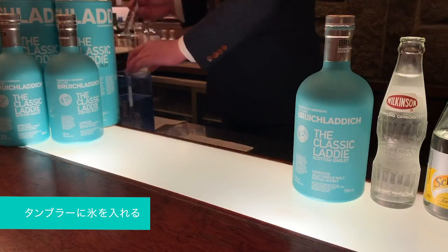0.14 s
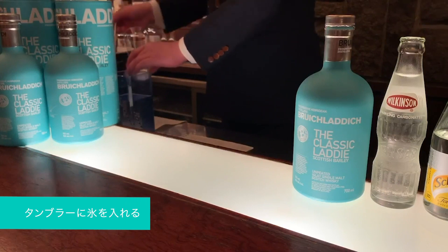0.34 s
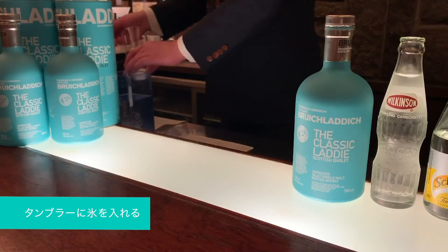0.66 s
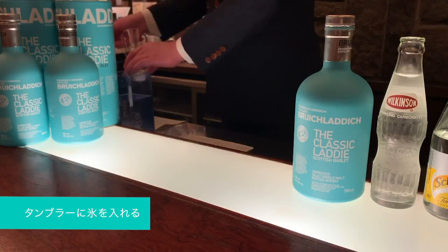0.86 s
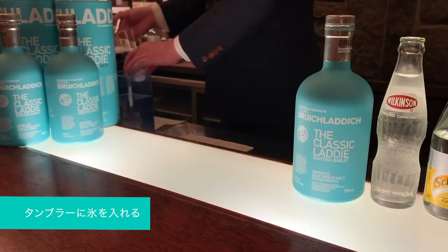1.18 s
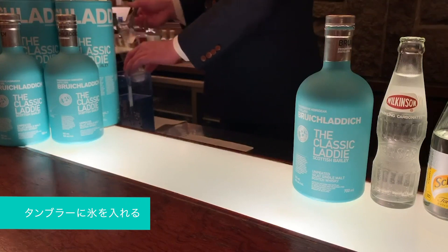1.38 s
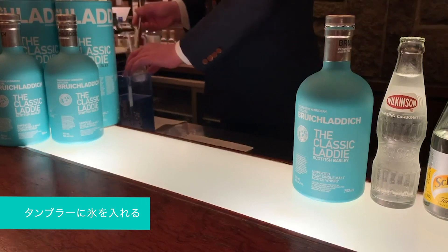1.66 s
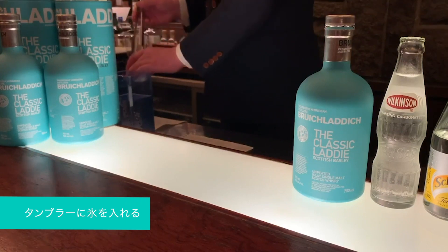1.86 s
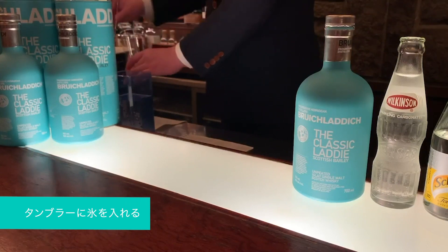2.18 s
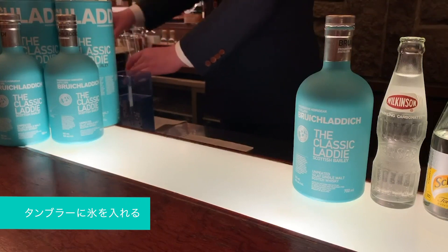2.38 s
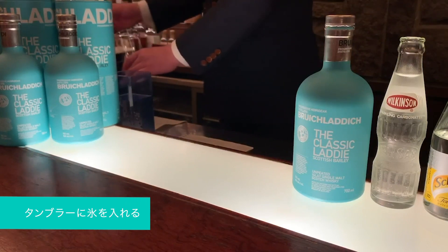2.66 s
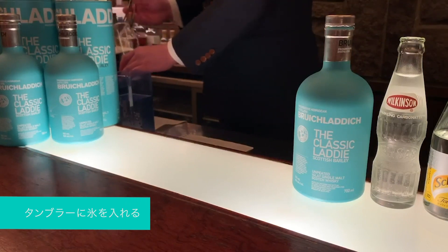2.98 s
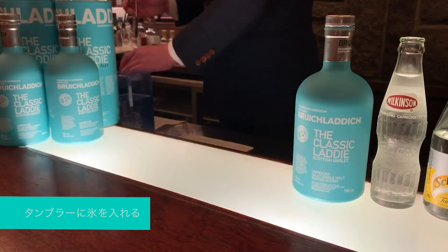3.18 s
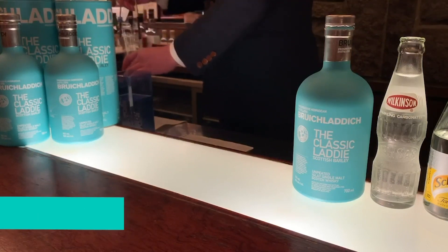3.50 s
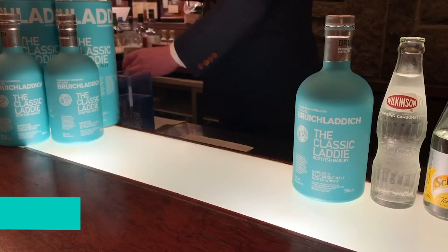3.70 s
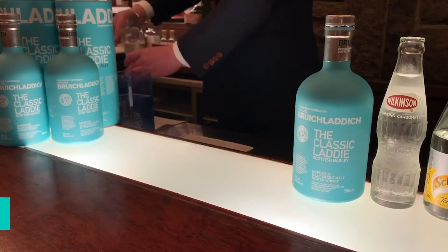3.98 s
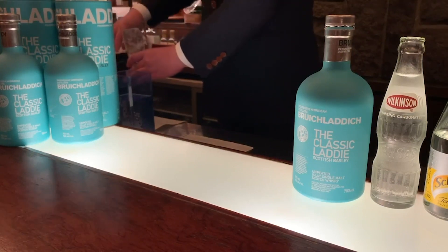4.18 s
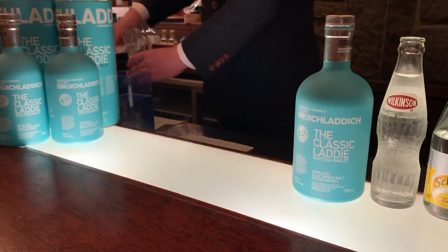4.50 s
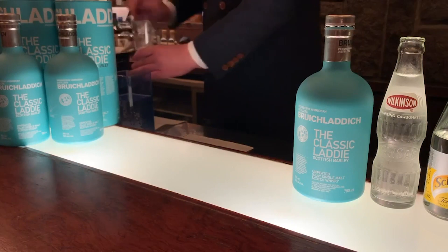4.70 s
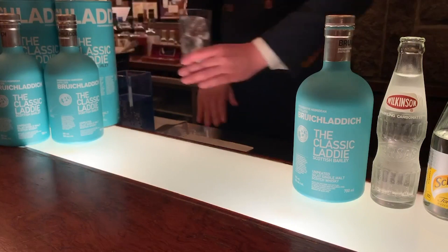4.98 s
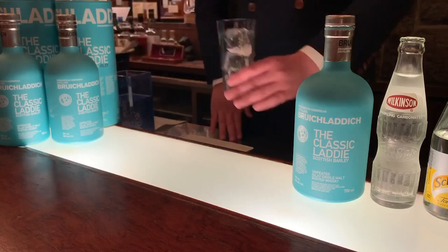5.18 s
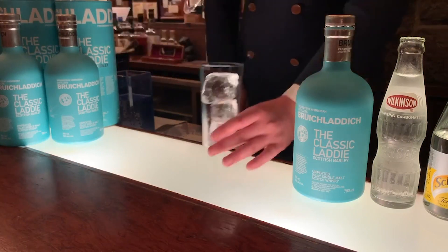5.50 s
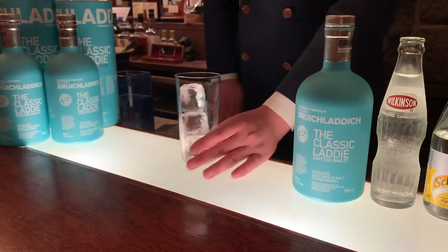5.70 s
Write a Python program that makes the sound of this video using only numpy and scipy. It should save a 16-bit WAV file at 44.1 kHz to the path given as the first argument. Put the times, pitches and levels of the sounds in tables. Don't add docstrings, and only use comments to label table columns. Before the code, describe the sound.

A small bar room hums with fridges and fans, a low steady drone with soft hiss cut off at the top. Immediately, a cube clinks into a tall glass, a bright crack with a few quick bounces. From 0.3 to 0.9 s tongs tick and loose ice shifts lightly in a bucket. A single tick at about 1.05 s, a small clink at 1.56, then at 1.8 the loudest event: a hard, piercing glass crack that rattles and settles within 0.15 s. Dry ticks and faint rustle come around 2.4 s. Light glass touches at 3.2 and 3.4 precede another cube at 3.5, chattering down. Ice crunches at 3.95, and a dense hollow bucket clatter follows at 4.45. Deep rumble swells most around 4.5 s and again near 5.2. The last second holds small ticks and sleeve rustle over the hum. Stereo pickup, two metres off, short reverberation.

```python
import sys
import numpy as np
from scipy import signal
from scipy.fft import rfft, irfft
from scipy.io import wavfile
from scipy.ndimage import uniform_filter1d

SR = 44100
rng = np.random.default_rng(int(sys.argv[2]) if len(sys.argv) > 2 else 0)


def store_pcm(level_fs):
    pcm = np.round(np.clip(level_fs, -1, 1) * 32767).astype(np.int16)
    wavfile.write(sys.argv[1], SR, np.atleast_2d(pcm).T)


def makeup_ratio(level_db):
    decades = np.asarray(level_db, float) / 20
    return 10 ** decades


N = 257940


def tilt(points, size):
    hz, db = np.transpose(points)
    return np.interp(np.log(np.fft.rfftfreq(size, 1 / SR) + 1), np.log(hz), db)


def band(x, lo_hz, hi_hz):
    return signal.sosfilt(signal.butter(3, [lo_hz, hi_hz], "bandpass", fs=SR, output="sos"), x)


def fade(t, t60):
    return np.exp(-np.log(1000) * t / t60)


def unit(x):
    return x / np.max(np.abs(x))


def walk(rate_hz):
    hold = int(SR / rate_hz)
    steps = np.repeat(rng.standard_normal(N // hold + 1), hold)
    return uniform_filter1d(steps, hold)[:N]


def add(out, start_s, x):
    i = int(start_s * SR)
    out[i:i + len(x)] += x[:len(out) - i]


# centre_s, peak_db
SHUDDERS = [
    (1.3, -48.5),
    (1.75, -49.5),
    (2.098, -50.5),
    (2.55, -40),
    (2.9, -43),
    (3.6, -38.5),
    (4.5, -34.5),
    (5.23, -37.5),
    (5.7, -53),
]


def rumble():
    floor_db, swell_s = -70.5, 0.19
    t = np.arange(N) / SR
    shudder = band(rng.standard_normal(N), 49, 72)
    swell = sum(makeup_ratio(db) * np.exp(-((t - s) / swell_s) ** 2) for s, db in SHUDDERS)
    return shudder / shudder.std() * makeup_ratio(-11.0) * (makeup_ratio(floor_db) + swell)


# pitch_hz, level_db, width_hz
MOTORS = [(55.2, -56.5, 5.3), (119.9, -53.5, 5), (179, -53, 7.3), (230, -55.5, 7.65), (254.9, -47.5, 4.55),
          (285.4, -50.5, 0.28), (717, -66.5, .5), (809.4, -58, 0.28)]


def motors():
    t, mid, side = np.arange(N) / SR, 0, 0
    for hz, db, width_hz in MOTORS:
        wander = np.cumsum(rng.standard_normal(N)) * np.sqrt(2 * np.pi * width_hz / SR)
        phase = 2 * np.pi * hz * t + wander
        size = np.sqrt(2) * makeup_ratio(db + 0.5 * width_hz * walk(9.5))
        mid = mid + size * np.sin(phase)
        side = side + size * min(hz / 1200, .5) * np.sin(phase + 1.3)
    return mid, side


def air(points, db):
    x = irfft(rfft(rng.standard_normal(N)) * makeup_ratio(tilt(points, N)), N)
    return x / x.std() * makeup_ratio(db + .8 * walk(3))


# pitch_hz, density_db (per Hz)
HUM_MID = [(15, -61.5), (25, -35), (48, -28.5), (69, -6.5), (90, -16), (123, -3.5), (256, -2), (350, -11.5),
           (510, -14.5), (680, -24.5), (830, -19), (887, -22), (5000, -53.5), (6500, -99.5), (11000, -120)]
HUM_SIDE = [(15, -73.5), (25, -53.5), (76, -25.5), (123, -24.5), (161, -13.5), (251, -6.5), (320, -13),
            (499, -13.5), (533, -15), (569, -14), (777, -28), (1240, -25.5), (5000, -45.5), (6500, -88),
            (11000, -120)]


def fridges_and_fans():
    tone_mid, tone_side = motors()
    mid = air(HUM_MID, -43.5) + tone_mid
    side = air(HUM_SIDE, -51.5) + tone_side - 0.068 * mid
    return mid, side


def grains():
    return rng.standard_normal(N) ** 3 * makeup_ratio(3 * walk(120) + 2.5 * walk(25))


# start_s, treble_peak_db,
# rise_s, die_away_s, low_grains_db (re treble)
RUSTLES = [(0.0, -24.5, 0.00077, 0.044, -6), (5.04, -58, 0.028, 0.1, -20), (0.298, -71.5, 0.0034, 0.69, 14),
           (0.499, -54, 0.048, 0.43, 1), (2.364, -51.5, 0.0075, 0.12, 4.2), (2.453, -50, 0.0037, 0.1, 3),
           (2.68, -71.5, 0.046, 0.38, 7), (3.001, -53.5, 0.032, 0.27, -2), (3.489, -36, 0.0033, 0.27, 2),
           (3.57, -58.5, 0.013, 0.067, -8), (3.771, -50, 0.0074, 0.14, -8.5),
           (3.935, -60.5, 0.0056, 0.056, -5), (3.97, -46, 0.012, 0.069, 3.5),
           (4.03, -66, 0.0099, 0.28, 16.5), (4.15, -69, 0.014, 0.066, 15.5),
           (4.245, -46.5, 0.021, 0.11, -5), (4.3, -53.5, 0.053, 0.083, 9.5), (4.7, -55.5, 0.065, 0.51, -1),
           (4.82, -48, 0.082, 0.38, -9), (4.91, -62, 0.037, 0.15, 8.5), (5.113, -56.5, 0.0038, 0.063, 8.5),
           (5.2, -72, 0.053, 0.45, -0.5), (5.414, -55.5, 0.0068, 0.25, -0.5),
           (5.518, -56, 0.0089, 0.27, -1.5), (5.69, -54, 0.023, 0.15, -2)]


def rustle():
    high, low = grains(), grains()
    high = band(high, 6600, 13000)
    low = band(low, 680, 8700) + 0.6 * band(low, 3610, 4790)
    high, low = high / high.std(), low / low.std()
    out, t = np.zeros(N), np.arange(N) / SR
    for s, db, rise_s, fall_s, low_db in RUSTLES:
        swell = np.clip((t - s) / rise_s, 0, 1) ** 2
        stroke = swell * fade(np.maximum(t - s - rise_s, 0) ** 2, fall_s ** 2)
        out += makeup_ratio(db) * stroke * (high + makeup_ratio(low_db) * low)
    return out


# start_s, peak_db, pitch_hz, treble_db (re peak)
TICKS = [(0.3114, -43, 2800, -28), (0.327, -62, 2410, -33), (0.442, -42.5, 2730, -16.5),
         (0.5342, -53, 3000, -4), (1.054, -38.5, 3480, -8), (2.3766, -43.5, 4500, -8),
         (2.4692, -36.5, 3610, -14), (3.0515, -51, 3740, 9), (3.782, -40, 4530, 2),
         (3.827, -51, 2400, 13.5), (3.938, -41, 3970, 11), (4.1567, -44, 4450, 0), (4.6311, -59, 2310, -27),
         (4.7679, -58, 2230, 20.5), (4.751, -58.5, 2300, 13), (5.0105, -60.5, 3900, 12),
         (4.8751, -47, 4130, -3), (4.964, -39, 3920, -7), (5.005, -58, 3960, 5), (5.1215, -43.5, 4150, 9.5),
         (5.164, -43, 4050, 5.5), (5.351, -39.5, 2800, -39.5), (5.4266, -64.5, 2630, -12),
         (5.8318, -60.5, 3100, 18.5)]


def ticks():
    out, t = np.zeros(N), np.arange(SR // 20) / SR
    for s, peak_db, hz, treble_db in TICKS:
        grit = rng.standard_normal(len(t))
        click = unit(band(grit * (1 - fade(t, .003)) * fade(t, .016), hz * .8, hz * 1.3))
        edge = unit(band(grit * fade(t, 0.013), 5800, 14000))
        add(out, s, makeup_ratio(peak_db + 7.5) * (click + makeup_ratio(treble_db) * edge))
    return out


# pitch_hz, t60_s
PARTIALS = [(1141, .2), (1227, .2), (1748, .2), (2288, .17), (2422, 1.2), (2860, .03), (4260, .06),
            (4290, .035), (5150, .9), (5480, .8), (6430, .1), (8980, .13), (10350, .12), (9570, .1),
            (9810, .15), (10900, .2), (9015, .15), (5900, .12), (8800, .2)]
# start_s, level_db
STRIKES = [
    [(3.551, -42.5)],
    [(1.862, -37.5)],
    [(.021, -47), (3.555, -39), (4.44, -38), (4.61, -45)],
    [(4.44, -40), (4.47, -44), (4.487, -43), (4.503, -38), (4.55, -49), (4.58, -50), (4.628, -51)],
    [(1.562, -62)],
    [(.313, -51), (.327, -45), (.443, -49), (5.354, -36.5)],
    [(.085, -39.5), (1.563, -33.5)],
    [(4.16, -40), (5.124, -44.5), (5.165, -44.5), (5.354, -46)],
    [(.02, -52.5), (1.575, -56.5)],
    [(1.575, -58.5)],
    [(1.807, -14.5)],
    [(.0205, -18.5), (.03, -32), (.04, -36), (.068, -35)],
    [(4.88, -46), (4.9, -42)],
    [(4.49, -34), (4.505, -30.5)],
    [(1.806, -27.5), (1.83, -32)],
    [(1.82, -29)],
    [(1.815, -25.5), (1.845, -31.5)],
    [(1.56, -48.5)],
    [(1.56, -45)],
]


def pings():
    beats_per_t60, flutter_db = 5, 4
    out, t = np.zeros(N), np.arange(SR // 2) / SR
    rise = 1 - fade(t, .004)
    for (hz, t60), strikes in zip(PARTIALS, STRIKES):
        for s, db in strikes:
            twin_hz = hz + beats_per_t60 / t60 * rng.uniform(0.34, 1.4)
            pair = np.sin(2 * np.pi * hz * t) + 0.73 * np.sin(2 * np.pi * twin_hz * t)
            add(out, s, makeup_ratio(db) * rise * fade(t, t60) * pair)
    return out * makeup_ratio(flutter_db * walk(60))


def knocks(hits, hollow, modes_hz, modes_db, mid_db, upper_db, ring_s, chatter_s, crack_db, thud_db, top_hz):
    out, t = np.zeros(N), np.arange(int(SR * .16)) / SR
    hz, db = (np.repeat(c, 4)[:, None] for c in (modes_hz, modes_db))
    for s, peak_db, low_db, blunt_db, bite_db in hits:
        chance = rng.standard_normal((4, len(t)))
        luck, split = chance[0, :len(hz), None], chance[3, :len(hz), None]
        _, low_hz, swell_s, low_s = [row for row in hollow if row[0] <= s][-1]
        low_hz *= 1 + 0.005 * chance[0, -1]

        pitch_hz = hz + 50 * split
        gain = makeup_ratio(db + 4.5 * luck)
        rings = fade(t, ring_s) * (gain * np.sin(2 * np.pi * pitch_hz * t)).sum(0)
        touch = (1 - fade(t, 0.0094)) * fade(t, chatter_s)
        chatter = (chance[1] ** 3 * touch)[:len(t) // 2]
        crack = makeup_ratio(crack_db) * chance[2] * touch
        body = unit(signal.fftconvolve(rings, chatter)[:len(t)]) + crack

        note = np.sin(2 * np.pi * low_hz * t) + makeup_ratio(thud_db) * np.sin(2 * np.pi * low_hz / 3 * t)
        note *= (1 - fade(t, swell_s)) * fade(t, low_s)

        parts = makeup_ratio(low_db) * unit(note)
        parts += makeup_ratio(mid_db + blunt_db) * unit(band(body, 480, 3290))
        parts += makeup_ratio(upper_db + bite_db) * unit(band(body, 3210, 5800))
        parts += unit(band(body, 6300, top_hz))
        release = np.minimum(t[::-1] / .03, 1)
        add(out, s, makeup_ratio(peak_db) * parts * release)
    return out


# hollow_note_db, lower_modes_db, upper_modes_db
HEAP_HITS = [(0.533, -48, -16, 0, 3), (0.559, -38, -11, -2, -2.5), (0.567, -41, -4, -6, -8),
             (0.585, -49, 10.5, 13, 0), (0.615, -48, -8, 6, -5), (0.631, -43.5, -6, 8.5, 2.5),
             (0.7074, -27.5, -25, -2, 0.5), (0.7139, -33.5, -14, -1.5, -9), (0.7254, -32.5, -14, -3, 1.5),
             (0.742, -40, -6.5, 7, 0), (0.7703, -38, -9, 8, 5), (0.8573, -35.5, 0, 3.5, 7),
             (0.8686, -34.5, -11, 6.5, 1), (0.88, -40.5, -6, 8, 2.5), (0.8953, -45.5, -2.5, 10, 5),
             (3.9393, -32, -14.5, -16, -8.5), (3.9619, -19, -12.5, -11.5, -8), (3.9743, -24, -22, -19, -10),
             (4.0561, -35, -18, -18, -7), (4.0797, -44.5, 2, 1, 4.5), (4.255, -35, -26, -7, -8),
             (4.3425, -42, 3.5, -10, -2), (4.3588, -35, -7.5, 0.5, -0.5)]
HEAP_HZ = [1700, 2100, 2900, 3500, 4200, 4900, 5600, 6300, 6800, 7700, 8700, 9300, 9900, 10450, 11000]
HEAP_DB = [3, 1, -24, -8, 6, 4, -35.5, -24, -1, 8, 8.5, 0, -7, -2, -24.5]
# from_s, pitch_hz, swell_s, ring_s
HOLLOW = [
    (0, 368.5, .04, .12),
    (3.9, 372.6, 0.045, 0.15),
    (4.4, 373.4, .04, 0.076),
]


def ice_heap():
    return knocks(HEAP_HITS, HOLLOW, HEAP_HZ, HEAP_DB, mid_db=-1.5, upper_db=0.0, ring_s=0.041,
                  chatter_s=0.037, crack_db=2.5, thud_db=-9.5, top_hz=11000)


# hollow_note_db, lower_modes_db, upper_modes_db
BUCKET_HITS = [(4.4353, -23.5, -2.5, 7.5, 2.5), (4.444, -20, -16, -11, 1), (4.455, -23, -7.5, 4.5, -1),
               (4.4694, -22.5, -3, -2, -8), (4.4818, -19.5, -18, 6, -2), (4.4939, -16, -23, -6, -4),
               (4.505, -23, -21, -5, -9), (4.5198, -27.5, -9, 5, -3), (4.5355, -36, 5.5, -6, -7),
               (4.5538, -46, 5, 7, -1), (4.58, -52, 9, 0, 0), (4.6074, -49.5, 5, 1, -6)]
BUCKET_HZ = [1744, 2288, 2896, 3085, 3612, 3900, 4360, 5152, 6115, 6750, 7400, 7725, 8360, 8829, 9566, 9970,
             10190, 10800]
BUCKET_DB = [-2, 7.5, -14, -12, -12, -8.5, -14, -6.5, 0.5, 2, -0.5, 8, 4, 2, 4, -25.5, -30.5, -31]


def bucket():
    return knocks(BUCKET_HITS, HOLLOW, BUCKET_HZ, BUCKET_DB, mid_db=-4, upper_db=6.5, ring_s=0.076,
                  chatter_s=0.02, crack_db=-3, thud_db=-10.5, top_hz=10230)


# air_column_db, lower_modes_db, upper_modes_db
TUMBLER_HITS = [(0.0045, -24, -30, -25, 2), (0.0195, -16, -4, 2, -11), (0.0294, -31, -7.5, 0.5, 6.5),
                (0.0404, -27, -1.5, 5, 4), (0.0544, -38, -16, -9, 6), (0.0694, -36, -20, 9, -4),
                (0.0874, -43, -22, 2.5, 0), (1.5594, -32, -22.5, -2, 0), (1.8035, -3.5, -37.5, -13, -16),
                (1.8095, -9.5, -35, -8, 0), (1.8144, -11.5, -8, -8, -5.5), (1.8284, -25, -14, -7, -8),
                (1.8381, -23, -34, -11, 0), (1.848, -29, -27, -7, 6), (1.8704, -22, -2.5, -6, -11),
                (1.8834, -25.5, -5, 3, 5.5), (1.899, -37, -19, 9, -12), (1.9144, -21, -32, 1, 0),
                (3.171, -33, -16, -1, 0), (3.18, -31.5, -11, -2, 3.5), (3.2094, -34, -22, 4, 2),
                (3.368, -35.5, -21.5, 5.5, 1), (3.377, -31, -12, -1, 4.5), (3.3877, -34.5, 9, 7, 1),
                (3.397, -34, 0.5, 9.5, 7), (3.4744, -15, -41, -14, -5), (3.483, -16.5, -22, -7, 0),
                (3.4934, -24, -20, -9, -1), (3.5044, -17.5, -12.5, -9, -3.5), (3.519, -23.5, -7, -21, -1),
                (3.5294, -23, -31, -8, -5), (3.541, -25.5, -9, -8, 3), (3.5574, -27.5, -6, 6, 0.5),
                (3.5814, -30, -4.5, -7, 8.5), (3.595, -31.5, -11, 0, -2), (3.62, -35, -17, -9, -4)]
TUMBLER_HZ = [1750, 2422, 2850, 3210, 4130, 4330, 4780, 5350, 5980, 6520, 6860, 7450, 8650, 9010, 9310,
              9480, 9800, 10020, 10300, 10900, 11200]
TUMBLER_DB = [-10.5, -36.5, -14.5, -6.5, 0, 4.5, -2.5, -14.5, -8.5, 1, -4, -5.5, -8, 0.5, -1, -1, -3, -4.5,
              -9, -2, 1]
# from_s, pitch_hz, swell_s, ring_s
COLUMN = [
    (0, 664, .007, 0.03),
    (1.5, 740, .012, .038),
    (1.86, 746, 0.017, .075),
    (3.0, 640, .035, 0.041),
    (3.5, 658, .02, 0.047),
    (3.55, 674, 0.023, 0.068),
]


def tumbler():
    return knocks(TUMBLER_HITS, COLUMN, TUMBLER_HZ, TUMBLER_DB, mid_db=-2.5, upper_db=0.0, ring_s=.075,
                  chatter_s=0.024, crack_db=-8.5, thud_db=-33.5, top_hz=11800)


# centre_hz, t60_s, level_db
ROOM_T60 = [
    (412, 0.16, -2.5),
    (1110, 0.32, -2),
    (3360, 0.38, 1.37),
    (8850, 0.27, 0.3),
]


def room(port, direct_db, wet_db, late_samples):
    t = np.arange(SR // 2) / SR
    edges = [60] + [np.sqrt(a[0] * b[0]) for a, b in zip(ROOM_T60, ROOM_T60[1:])] + [15000]
    tail = np.zeros(len(t))
    for lo, hi, (_, t60, db) in zip(edges, edges[1:], ROOM_T60):
        tail += band(rng.standard_normal(len(t)), lo, hi) * fade(t, t60) * makeup_ratio(db)
    tail *= makeup_ratio(5 * fade(t, .5) * walk(200)[:len(t)])
    tail *= makeup_ratio(wet_db) * (1 - fade(t, 0.016))
    tail[late_samples] += makeup_ratio(direct_db)
    cepstrum = irfft(np.log(makeup_ratio(tilt(port, size=2048))))
    cepstrum[1:1024] *= 2
    cepstrum[1025:] = 0
    return signal.fftconvolve(tail, irfft(np.exp(rfft(cepstrum))))


# pitch_hz, gain_db
PORT_MID = [(90, 4.5), (1500, -2), (5000, -6), (6700, -10), (7100, -8), (8000, -1), (8500, -4),
            (10200, -0.5), (10700, -4.5), (11500, -13), (12000, -28)]
PORT_SIDE = [(90, -38.5), (600, -6), (1500, -1.5), (6000, -10), (7600, 0), (8200, -15), (8500, -42),
             (9700, -34.5), (10300, -1), (10800, 0.5), (11600, -8.5), (12000, -30)]


def scene():
    hiss = makeup_ratio(-81.5) * rng.standard_normal(N)
    dry = makeup_ratio(-2.5) * (tumbler() + bucket() + ice_heap()) + makeup_ratio(-4.5) * rustle() + hiss
    close = pings() + makeup_ratio(-5.0) * ticks()
    mid, side = fridges_and_fans()
    mid = mid + rumble()
    mid += signal.fftconvolve(dry, room(PORT_MID, 2.3, -28.0, late_samples=0))[:N]
    side += signal.fftconvolve(dry, room(PORT_SIDE, -0.5, -25.0, late_samples=9))[:N]
    mid += signal.fftconvolve(close, room(PORT_MID, 1.5, -37, late_samples=0))[:N]
    side += signal.fftconvolve(close, room(PORT_SIDE, -4, -37, late_samples=9))[:N]
    return np.array([mid + side, mid - side])


def widen(v):
    coarse = v[32:].reshape(24, 4, -1).mean(1)
    return np.vstack([v[:32], np.repeat(coarse, 4, axis=0)])


def starve(x, margin_db, luck_db):
    _, _, z = signal.stft(x, nperseg=2048, noverlap=1024)
    bands = z[:1024].reshape(128, 8, -1)
    db = 10 * np.log10(np.mean(np.abs(bands) ** 2, axis=1) + 1e-18)
    luck = uniform_filter1d(rng.standard_normal(db.shape), size=4, axis=1) * np.sqrt(4)
    luck = uniform_filter1d(luck, size=3, axis=0) * np.sqrt(3)
    hz = np.arange(128)[:, None] * SR / 256
    near_db = widen(uniform_filter1d(db, size=13, axis=0))
    luck = widen(luck) * (1 + .3 * (hz > 5500))
    db, hz = widen(db), widen(hz)

    chance_db = db + luck_db * luck
    hunger_db = 6 * (hz > 6900) * (hz < 8400)
    keep = chance_db > near_db - margin_db + hunger_db
    keep &= (hz < 10500) | (chance_db > -94 + 7 * (hz - 10500) / 1000)
    keep &= (hz < 5800) | (hz > 8400) | (chance_db > -103)
    keep[:9] = True
    strong = np.abs(z[:1024]) > np.repeat(makeup_ratio(db - 4) * (hz > 4000), 8, axis=0)
    z[:1024] *= strong * np.repeat(keep, 8, axis=0)
    return signal.istft(z, nperseg=2048, noverlap=1024)[1][:N]


def roll_off(x):
    return signal.sosfilt(signal.butter(12, 12390, fs=SR, output="sos"), x)


def record(dry):
    left, right = signal.sosfilt(signal.ellip(8, .2, 70, 12300, fs=SR, output="sos"), dry)
    mid = starve((left + right) / 2, margin_db=5., luck_db=3.6)
    side = starve((left - right) / 2, margin_db=5., luck_db=3.6)
    return roll_off(np.array([mid + side, mid - side]))


dry = scene()
out = record(dry)
store_pcm(out)
```